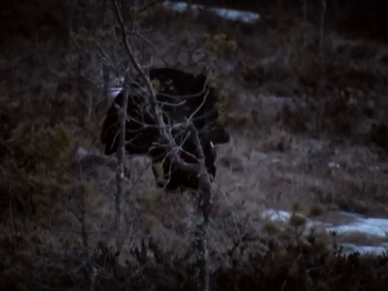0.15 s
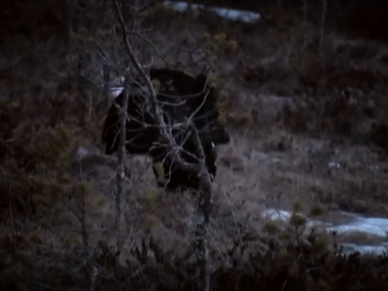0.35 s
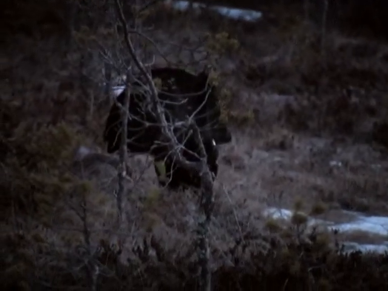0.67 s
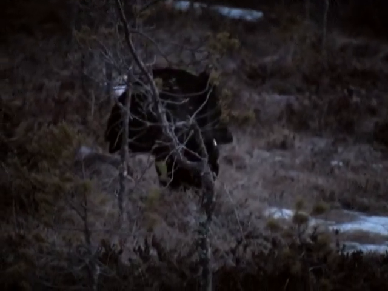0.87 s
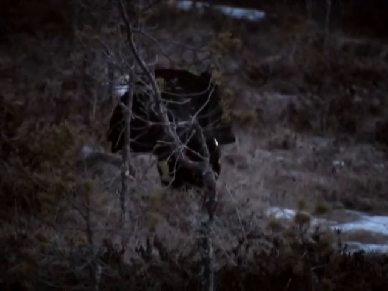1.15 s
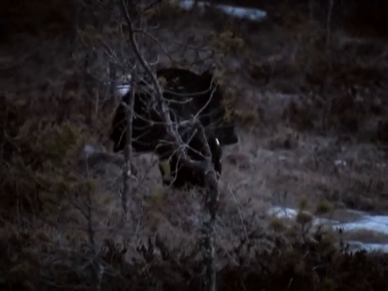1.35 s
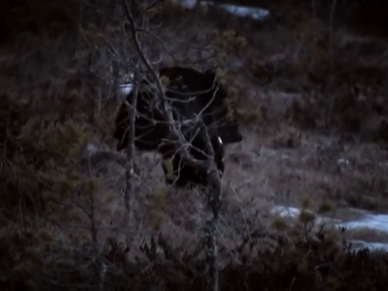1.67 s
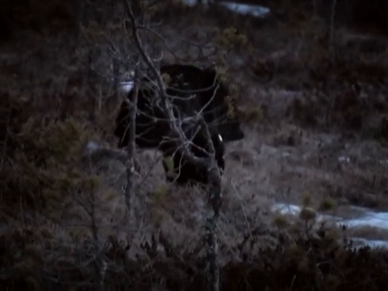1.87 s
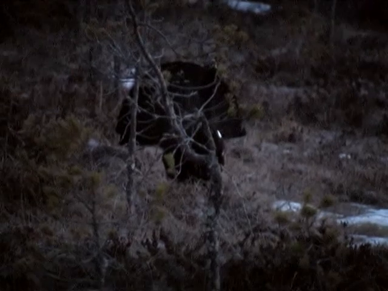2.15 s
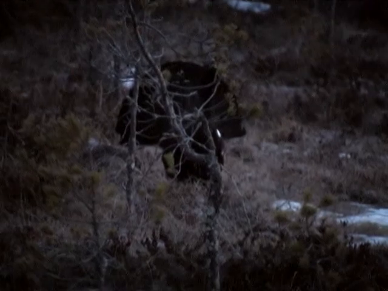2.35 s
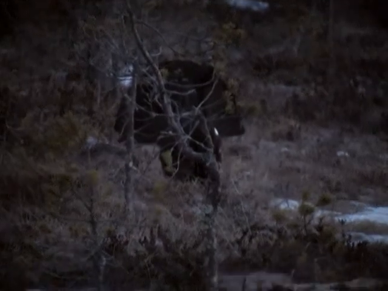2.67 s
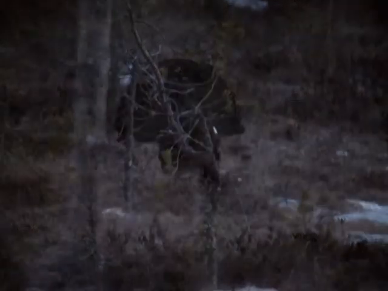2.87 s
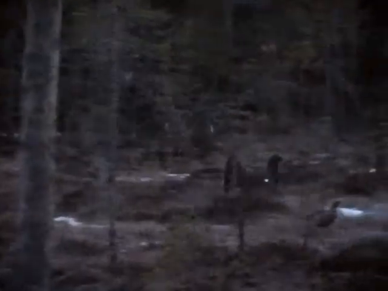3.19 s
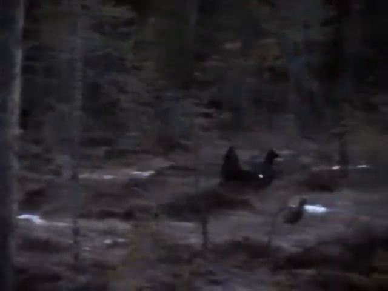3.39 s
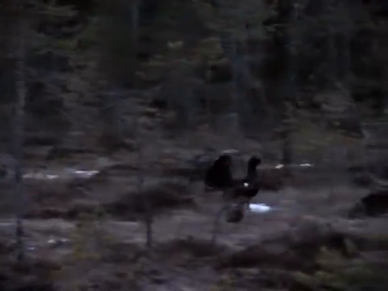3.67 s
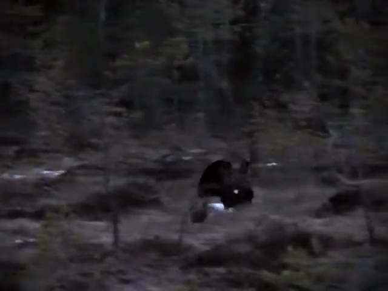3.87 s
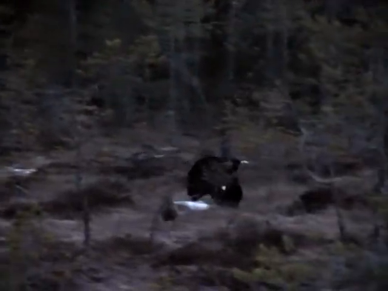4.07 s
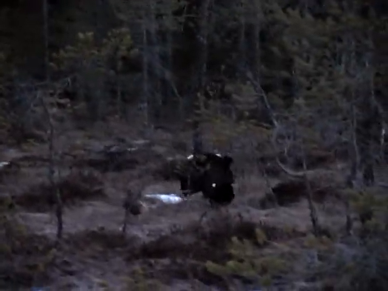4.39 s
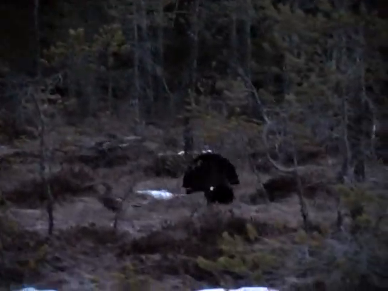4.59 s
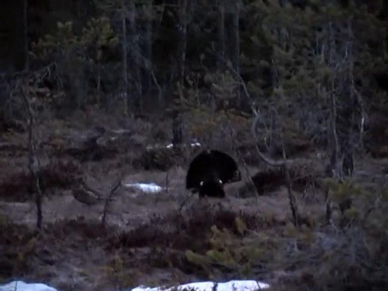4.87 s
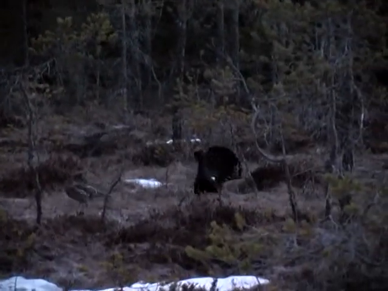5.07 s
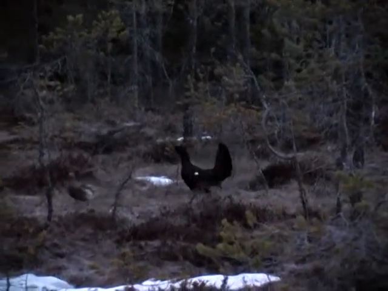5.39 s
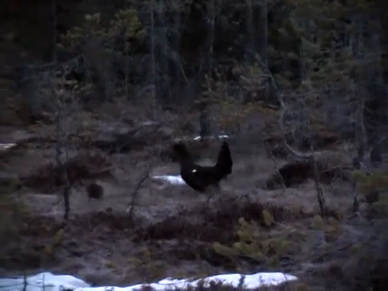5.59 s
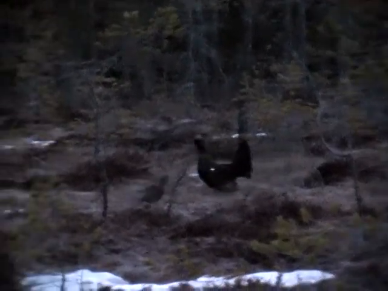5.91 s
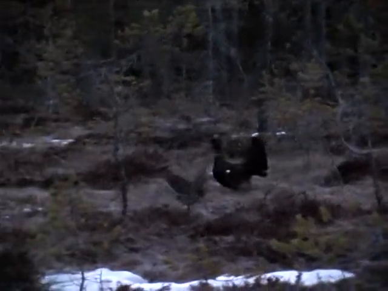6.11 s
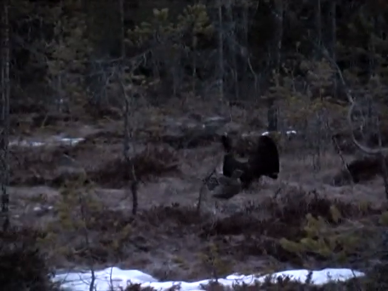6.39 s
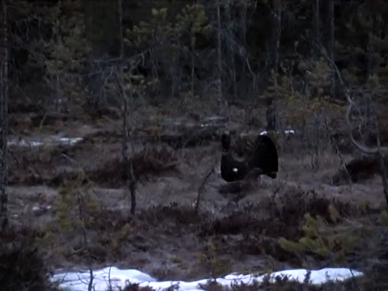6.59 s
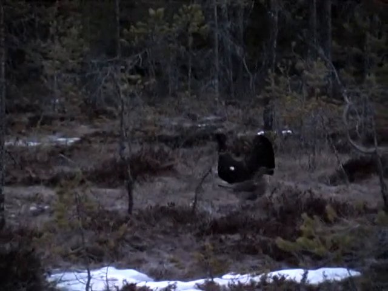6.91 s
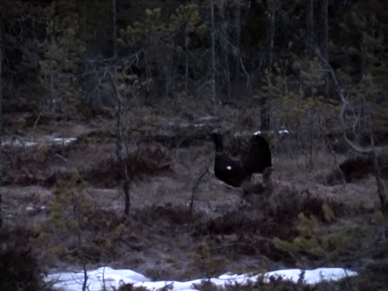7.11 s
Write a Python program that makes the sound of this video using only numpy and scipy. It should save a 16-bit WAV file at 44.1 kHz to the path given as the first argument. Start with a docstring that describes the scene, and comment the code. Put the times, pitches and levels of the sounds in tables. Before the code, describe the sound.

A quiet outdoor bog beside pines, with low wind hum, a blur of distant birds and steady microphone hiss throughout. From the start, faint dry capercaillie clicks scatter irregularly, with sharp louder snaps near 0.4, 1.3, 2.5 and 3.4 seconds; each cracks, rings briefly like a hollow pipe and ends in a soft low pop. A faint scrape passes at 2.1 and a weak falling chirp at 2.8. From about 3 the background brightens with heather ticks and crackle, and faint thrush whistles echo far off. A soft low bump comes near 3.9. Short scratchy whetting strokes run from 3.7 to 5.8, with very loud clicks at 4.5 and 5.0. A songbird's quick gliding phrase sounds at 5.0 and again at 6.4. Clicks cluster around 6 to 6.2, another snaps at 6.8, and sparse scrapes and distant whistles continue to the end, just past 7.

```python
"""Dry throat clicks over wind hum and hiss open the scene: capercaillie cocks display on a bog at dawn.
Each click is a crack and a ringing windpipe, then a soft low pop; whetting strokes are scratchy puffs of noise.
A near songbird chirps and a far thrush whistles into the forest echo, both as gliding tones.
Heather ticks and crackles in short noise grains, and something bumps softly as brief low swells.
Shaped noise makes the wind in the pines, the blur of far birds and the microphone hiss."""
import sys
import numpy as np
from scipy import signal
from scipy.fft import rfft, irfft, next_fast_len
from scipy.io import wavfile
from scipy.ndimage import uniform_filter1d, map_coordinates

SR = 44100
rng = np.random.default_rng(int(sys.argv[2]) if len(sys.argv) > 2 else 0)


def file_out(sig):
    """Save sig as 16-bit WAV at sys.argv[1]."""
    # one column per channel
    cols = np.atleast_2d(sig).T
    # limit, then scale
    lim = np.clip(cols, -1, 1)
    pcm = np.round(lim * 32767).astype(np.int16)
    wavfile.write(sys.argv[1], SR, pcm)


N = 319725

# throat clicks: start_s, peak_db, main_ring_hz, brightness_db
CLICKS = [(0.0144, -26.5, 2760, -13), (0.136, -33.5, 2880, -4), (0.186, -22, 2140, -14),
          (0.2187, -30.5, 4150, -5), (0.315, -27.5, 3680, -13), (0.325, -31, 2350, -15),
          (0.3596, -20.5, 2020, -15), (0.401, -20, 1980, -20), (0.4295, -2.5, 2140, -6),
          (0.4927, -22, 3100, -15), (0.5528, -17, 3060, -8), (0.745, -20.5, 2908, -17.5),
          (1.271, -5, 2230, -4), (1.281, -18.5, 2780, -13), (1.381, -25, 2260, -11),
          (1.3988, -11.5, 3080, -14), (1.6437, -22.5, 2910, -16), (1.72, -28, 3040, -25),
          (1.747, -18.5, 2206, -32), (1.8553, -24, 2830, -13), (1.9067, -22, 2120, -39),
          (1.968, -29, 2900, -18), (2.139, -27, 2840, -7), (2.184, -20, 2120, -14.5),
          (2.2276, -20, 2020, -9), (2.4944, -4.5, 2160, 0), (2.607, -22, 3110, -13), (2.715, -27, 2860, -8),
          (2.9171, -26.5, 2830, 1), (3.002, -27, 2800, -7), (3.087, -19, 2790, -18),
          (3.2337, -17.5, 4030, -15), (3.4095, -0.5, 2196, -8.5), (3.4261, -23, 2830, -21),
          (3.5467, -8.5, 2410, -11.5), (4.4827, 3.5, 3900, -9.5), (4.5946, -6, 2270, -12),
          (4.9753, 1, 3080, -3), (4.987, -11, 3050, -7), (5.0744, -9.5, 2980, 10), (5.3794, -6.5, 3080, 0),
          (5.393, -19.5, 2990, -5), (5.468, -19, 4380, -12), (5.669, -9.5, 3000, -7),
          (5.7348, -16.5, 3060, -14), (5.8466, -12.5, 2850, -7), (5.945, -13.5, 2810, -7.5),
          (6.0299, -16.5, 2800, -9), (6.049, -24.5, 1500, -28), (6.113, -19.5, 3250, -4),
          (6.1613, -3, 2090, 0), (6.2067, -7.5, 2050, -1), (6.364, -17.5, 3170, -7.5),
          (6.8198, -12.5, 3450, -4), (6.9468, -19, 2086, -15)]
# ringing modes of the windpipe at rest: pitch_hz, level_db
PIPE_MODES = [(1457, 0.5), (2181, 6.5), (2700, 10.5), (3130, 10.5), (3650, 11), (4130, 19.5), (4650, 13.5),
              (5300, 8), (5760, 2.5), (6300, 6)]
# dull bumps and hollow knocks: start_s, level_db, pitch_hz, swell_s
BUMPS = [(.552, -39, 720, .004), (3.8655, -24, 330, .0009), (6.364, -36, 780, .004)]
# whetting strokes: start_s, length_s, level_db (before the swell), centre_hz
STROKES = [(2.13, 0.22, -47, 4300), (3.707, 0.057, -41.5, 5120), (3.843, 0.03, -38.5, 4530),
           (3.916, 0.038, -52, 4780), (4.152, 0.094, -36, 4100), (4.272, 0.085, -40.5, 5200),
           (4.369, 0.058, -40, 4900), (4.45, 0.076, -36.5, 5340), (4.605, 0.12, -36, 4700),
           (4.809, 0.027, -39.5, 5370), (4.836, 0.063, -33, 4140), (4.926, 0.026, -38.5, 3800),
           (5.08, 0.064, -36.5, 4270), (5.21, 0.028, -43, 5000), (5.281, 0.018, -42, 5200),
           (5.372, 0.088, -38.5, 4430), (5.514, 0.052, -33, 3670), (5.624, 0.011, -35, 3930),
           (5.665, 0.098, -34.5, 4140), (6.19, 0.064, -38, 4830), (6.578, 0.076, -39, 5200),
           (6.805, 0.05, -41.5, 5600), (6.909, 0.044, -37, 4600), (6.996, 0.036, -38.5, 4700)]
# resonances of the throat during a stroke: pitch_hz, width_hz, level_db
THROAT = [(2700, 630, -2.5), (3930, 330, 0), (4970, 400, -1.5), (5890, 1600, -1.5), (8950, 5500, -5)]
# glides of the songbird's phrase: start_s (within it), length_s, first_hz, aim_hz, bend (no unit),
# level_db (before swell and flutter)
PHRASE = [(0, 0.056, 2955, 4620, 6.6, -34), (0.095, 0.0177, 4030, 2720, 0.88, -37),
          (0.131, .027, 3170, 4550, 0.43, -38.5)]
# times the phrase is sung: start_s, gain_db
PHRASE_STARTS = [(4.995, 1), (6.365, 1.5)]
# one lone falling glide: same columns as the phrase, but start_s counts from the beginning of the scene
LONE_CHIRP = (2.795, .075, 2860, 2186, 1.1, -46)
# far thrush notes: start_s, shape (a name), first_hz, level_db (before swell and flutter)
THRUSH_NOTES = [(3.1, "rise", 2840, -48.5), (3.29, "rise", 2380, -49.5), (3.564, "hold", 2627, -53),
                (4.895, "rise", 2417, -44), (5.05, "hold", 2350, -52), (5.639, "rise", 2530, -45),
                (5.749, "fall", 2635, -45.5), (5.906, "hold", 2364, -52.5), (6.53, "rise", 2470, -46),
                (6.619, "fall", 2546, -49.5), (6.85, "hold", 2266, -51.5), (7.12, "hold", 2290, -52)]
# shapes of those notes, by name: length_s, aim_over_first (pitch ratio)
NOTE_SHAPES = dict(rise=(.065, 1.12), fall=(.09, .87), hold=(.2, .99))
# the clearest heather ticks: start_s
TICK_TIMES = [3.143, 3.256, 4.0592, 4.105, 4.2622, 4.335, 4.404, 4.446]
# slow changes of the background: time_s, pine_hum_db, hiss_db, far_chatter_db,
# heather_crackle_db (before colouring)
AIR_LEVELS = [(0, -45, -48.5, -49, -60), (2.3, -45.5, -48, -47, -58), (2.9, -47, -51.5, -50.5, -55),
              (3.5, -43.5, -47, -44, -47), (4.9, -44, -48, -47.5, -48.5), (6.3, -43, -47.5, -44.5, -48.5),
              (7.25, -44.5, -48.5, -50, -53)]
# colour of the pine hum: pitch_hz, relative_level_db
HUM_COLOUR = [(20, -22.5), (136, -6.5), (280, 1), (517, -8.5), (608, -9.5), (1500, -31), (3300, -120)]
# colour of the far bird chatter: pitch_hz, relative_level_db
CHATTER_COLOUR = [(1100, -13), (1600, -7), (2100, 2), (2700, 5), (3300, -1), (4100, -0.5), (5000, -10),
                  (8000, -37)]
# colour of the microphone hiss: pitch_hz, relative_level_db
HISS_COLOUR = [(600, -78), (1200, 0.5), (6000, 5.5), (15000, 2.5)]
# stereo width of the background: pitch_hz, side_over_mid_db
STEREO_WIDTH = [(40, -9), (380, -34.5), (2380, -42), (5980, -10), (15000, -4)]

RISE_S = 0.001241  # the crack peaks this long after the snap starts
CRACK_HZ, CRACK_S = 3300, 0.00017  # pitch and half length of one sharp pressure swing
CRACK_DB, CRACK_GROWS = 8.5, 0.5  # level over the ring for a 0 dB click, dB more per dB of effort
MAIN_DB, BELOW_DB = 8, -3.5  # lift of the main ring, loss of the modes under it
RING_T60_S, SHUT_S = 0.027, 0.011  # typical 60 dB decay of the ring; the throat closes on it
LOW_CUT_HZ = 1360  # the narrow windpipe radiates little below
POP_LAG_S = 0.00489  # the air sac answers this late
PUFFS_PER_S = 590  # in a stroke, before the rate wanders
CRACKLE_PER_S = 2700  # average; stems brushed by trailing wings
TICK_DB = -32.5  # typical, before colouring
TOP_HZ = 15300


def clicks():
    """Each snap rings the windpipe and, a moment later, pops the air sac; dull bumps join in."""
    out = np.zeros(N)
    for start_s, db, main_hz, bright_db in CLICKS:
        add(out, start_s, amp(db) * snap(db, main_hz, bright_db))
        # the air sac grows less than the snap with effort
        pop_hz = 300 * np.exp(0.16 * rng.standard_normal())
        add(out, start_s + POP_LAG_S, pop(-28 + 0.56 * db, pop_hz, swell_s=0.0034))
    for start_s, *bump in BUMPS:
        add(out, start_s, pop(*bump))
    return out


def snap(db, main_hz, bright_db):
    """A sharp crack, then a short ring of the windpipe; peak 1."""
    t = np.arange(SR // 20) / SR - RISE_S
    hz, level_db = np.transpose(PIPE_MODES)[:, :, None]
    chance = rng.standard_normal((3, len(PIPE_MODES), 1))
    main = np.argmin(np.abs(hz - main_hz))
    hz = hz * main_hz / hz[main]  # the neck stretches, all modes move together

    # a tighter throat lifts the upper modes
    tightness = np.clip((hz - 2500) / 1500, 0, 1)
    gain_db = level_db + 3 * chance[0] + bright_db * tightness
    gain_db[main] += MAIN_DB
    gain_db[:main] += BELOW_DB
    decay_s = RING_T60_S * np.exp(0.3 * chance[1])
    decay_s[main] *= 1.5  # the main ring tends to last longest

    modes = amp(gain_db - 60 * t / decay_s) * np.cos(2 * np.pi * hz * t + chance[2])
    ring = np.sum(modes, axis=0) * (t > 0)
    ring *= np.exp(-(t / SHUT_S) ** 4)
    ring *= 1 - np.exp(-np.abs(t) / 0.0003)  # builds up quickly but smoothly
    crack = -np.cos(2 * np.pi * CRACK_HZ * t) * np.exp(-(t / CRACK_S) ** 2 / 2)
    click = ring / np.max(np.abs(ring)) + amp(CRACK_DB + CRACK_GROWS * db) * crack
    click = filtered(click, lambda f: 1 / (1 + (LOW_CUT_HZ / (f + 1)) ** 8))
    return click / np.max(np.abs(click))


def pop(db, hz, swell_s):
    """A soft low push of air that swells, then dies away."""
    t = np.arange(SR // 20) / SR
    swell = t / swell_s * np.exp(1 - t / swell_s)
    return amp(db) * swell * np.sin(2 * np.pi * hz * t)


def strokes():
    """Uneven puffs of turbulent air scrape through the throat; each stroke swells and stops short."""
    out = np.zeros(N)
    for start_s, length_s, db, centre_hz in STROKES:
        u = np.linspace(0, 1, round(length_s * SR) + 64)
        # the puff rate jumps every 64 samples
        wander = np.repeat(0.64 * rng.standard_normal(len(u) // 64 + 1), 64)[:len(u)]
        puff_count = np.floor(np.cumsum(PUFFS_PER_S / SR * np.exp(wander)))
        puffs = np.diff(puff_count, prepend=0) * amp(3.04 * rng.standard_normal(len(u)))
        breath = 9 * puffs + 0.35 * rng.standard_normal(len(u))
        scrape = unit(filtered(breath, lambda f: throat(f) * focus(f, centre_hz)))
        add(out, start_s, amp(db) * scrape * np.sin(np.pi * u ** 1.4) ** 0.5)
    return out


def throat(f):
    """Resonances of the throat, added with alternating sign."""
    total = 0
    for k, (hz, width_hz, db) in enumerate(THROAT):
        resonance = 1j * f * width_hz / (hz * hz - f * f + 1j * f * width_hz)
        total = total + (-1) ** k * amp(db) * resonance
    return total


def focus(f, centre_hz):
    """A broad hill of pitch around the stroke's centre, with a narrow peak on top."""
    hill = amp(-19 * np.log2((f + 1) / centre_hz) ** 2)
    return hill * (1 + 1.2 * np.exp(-((f - centre_hz) / 250) ** 2))


def songbird():
    """Gliding whistles: the same phrase each time, and one lone falling chirp."""
    out = np.zeros(N)
    for phrase_s, db in PHRASE_STARTS:
        for start_s, *glide in PHRASE:
            add(out, phrase_s + start_s, amp(db) * whistle(*glide))
    add(out, LONE_CHIRP[0], whistle(*LONE_CHIRP[1:]))
    return out


def whistle(length_s, first_hz, aim_hz, bend, db, waver_db=2.5):
    """A slightly fluttering tone that glides, swells and fades."""
    u = np.linspace(0, 1, round(length_s * SR) + 64)
    glide = 0.388 * u + 0.632 * u ** bend  # ends 2 % past the aim
    pitch_hz = first_hz + (aim_hz - first_hz) * glide
    tone = np.sin(2 * np.pi * np.cumsum(pitch_hz) / SR)
    flutter_db = waver_db * unit(uniform_filter1d(rng.standard_normal(len(u)), size=150))
    swell = np.abs(np.sin(np.pi * u)) ** 0.5
    return np.sqrt(2) * amp(db + flutter_db) * swell * tone


def thrush():
    """Soft slurred whistles from far away, each gliding up or down by its shape."""
    out = np.zeros(N)
    for start_s, shape, hz, db in THRUSH_NOTES:
        length_s, slur = NOTE_SHAPES[shape]
        add(out, start_s, whistle(length_s, hz, hz * slur, 1.0, db, waver_db=2.8))
    return out


def twigs():
    """Single bright ticks over a clumped crackle of brushed stems, all short noise grains."""
    clumps_db = 2.8 * map_coordinates(rng.standard_normal(N // 1024 + 4), [np.arange(N) / 1024])
    grains = (rng.random(N) < CRACKLE_PER_S / SR) * rng.standard_normal(N)
    crackle = unit(grains * amp(clumps_db + 1.5 * rng.exponential(size=N)))
    time_s, *_, crackle_db = np.transpose(AIR_LEVELS)
    out = crackle * amp(np.interp(np.arange(N) / SR, time_s, crackle_db))
    # every tick is the same burst, dying by 60 dB in 0.0078 s
    burst = rng.standard_normal(200) * amp(-60 * np.arange(200) / SR / 0.0078)
    for start_s in TICK_TIMES:
        add(out, start_s, amp(TICK_DB + rng.normal(0, 1.5)) * burst)
    # bright colour centred on 5800 Hz
    return filtered(out, lambda f: 2 * np.exp(-np.log2((f + 1) / 5800) ** 2 / 0.48))


def air():
    """Wind in the pines, a blur of far birds and the hiss of the microphone, all shaped noise."""
    time_s, *levels_db, _ = np.transpose(AIR_LEVELS)
    hum, hiss, chatter = (amp(np.interp(np.arange(N) / SR, time_s, db)) for db in levels_db)
    out = hum * rush(HUM_COLOUR, patchy_db=1.5)
    out += hiss * rush(HISS_COLOUR, patchy_db=1.6)
    return out + chatter * rush(CHATTER_COLOUR, patchy_db=2.5)


def rush(colour, patchy_db):
    """Stereo noise of rms 1 with patches of random gain in time and pitch."""
    z = signal.stft(rng.standard_normal((2, N)), nperseg=512)[2]
    patches = uniform_filter1d(rng.standard_normal(z.shape[1:]), size=5, axis=0)
    patches = uniform_filter1d(patches, size=10, axis=1)
    pair = signal.istft(z * amp(patchy_db * unit(patches)), nperseg=512)[1][:, :N]
    mid, side = filtered(pair, lambda hz: amp(along(colour, hz) + [0 * hz, along(STEREO_WIDTH, hz)]))
    return unit(np.array([mid + side, mid - side]))


def forest(x, db, t60_s, delay_s):
    """Trunks scatter the sound back as a dense dying tail of about 1 s; the treble dies sooner."""
    hz, t, z = signal.stft(rng.standard_normal(SR), SR, nperseg=128)
    hurry = 0.5 + (hz[:, None] / 3500) ** 2  # is 1, so t60_s holds exactly, near 2500 Hz
    tail = signal.istft(z * amp(-60 * t / t60_s * hurry), SR, nperseg=128)[1]
    tail = np.pad(tail, (round(delay_s * SR), 0))
    return amp(db) * signal.fftconvolve(x, tail / np.linalg.norm(tail))[:N]


def amp(db):
    """Gain of a level in dB."""
    return 10 ** (np.asarray(db) / 20)


def unit(x):
    """x at rms 1."""
    return x / np.sqrt(np.mean(x ** 2) + 1e-20)


def along(points, hz):
    """(Hz, value) points read on a log pitch axis."""
    f, v = np.transpose(points)
    return np.interp(np.log(hz + 1), np.log(f + 1), v)


def filtered(x, response):
    """x times a response of frequency, which may be complex."""
    n = x.shape[-1]
    m = next_fast_len(n + SR // 4)
    return irfft(rfft(x, m) * response(np.fft.rfftfreq(m, 1 / SR)), m)[..., :n]


def add(track, start_s, sound):
    """Mixes a sound into the track from start_s on."""
    part = track[round(start_s * SR):][:len(sound)]
    part += sound[:len(part)]


def scene():
    """Near voices with a faint short echo, the far thrush with a strong long one, over the air."""
    near = clicks() + strokes() + songbird() + twigs()
    far = thrush()
    near_echo = forest(near, db=-21, t60_s=0.35, delay_s=0.012)
    far_echo = forest(far, db=0, t60_s=1.3, delay_s=0.04)
    return near + near_echo + far + far_echo + air()


def record(dry):
    """Peaks beyond full scale are cut flat, then nothing stays above the band limit."""
    return filtered(np.clip(dry, -1, 1), lambda hz: hz < TOP_HZ)


dry = scene()
out = record(dry)
file_out(out)
```